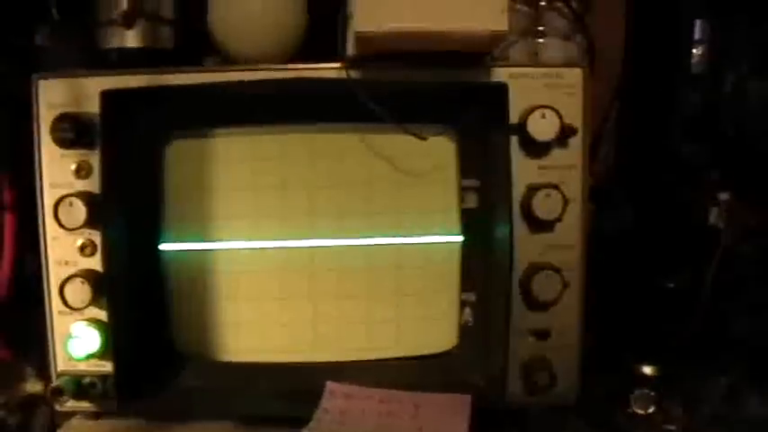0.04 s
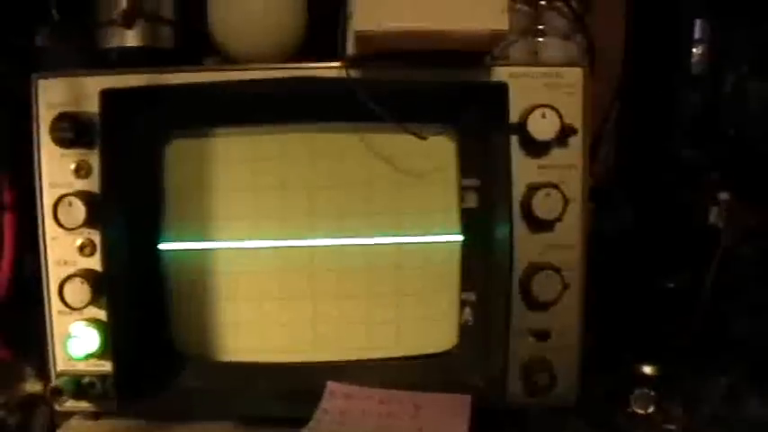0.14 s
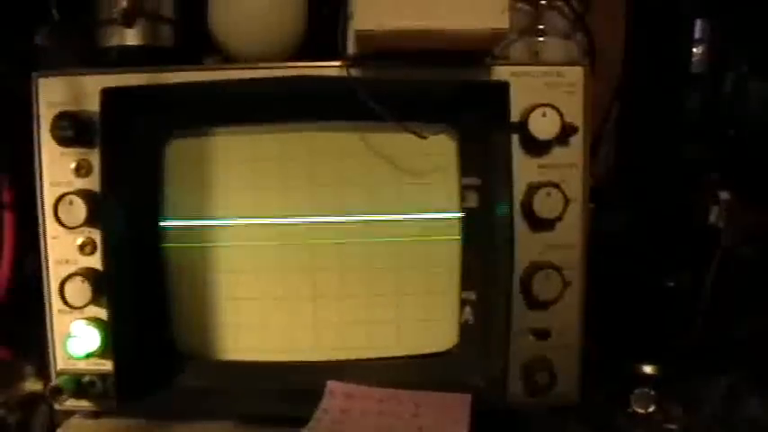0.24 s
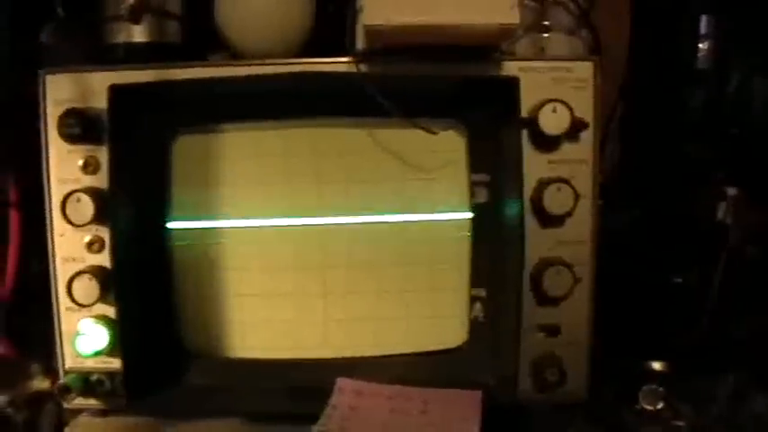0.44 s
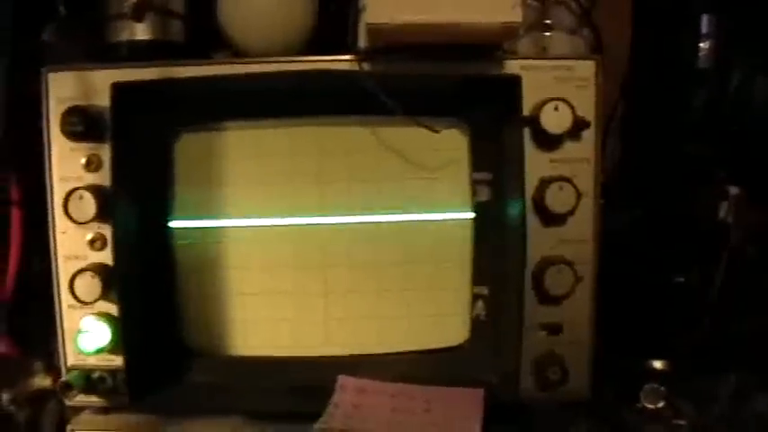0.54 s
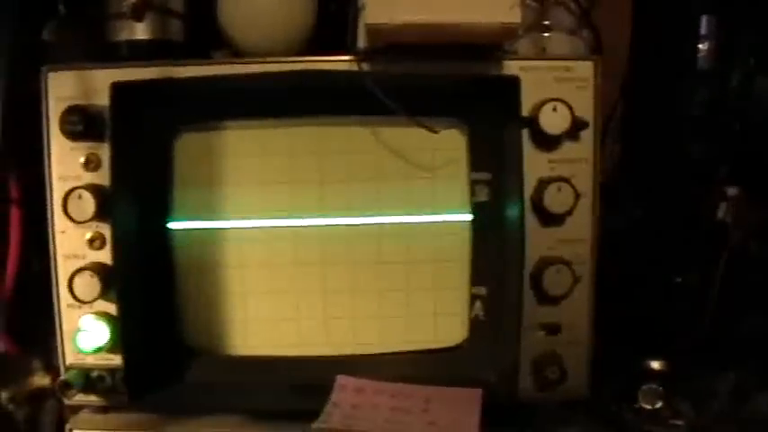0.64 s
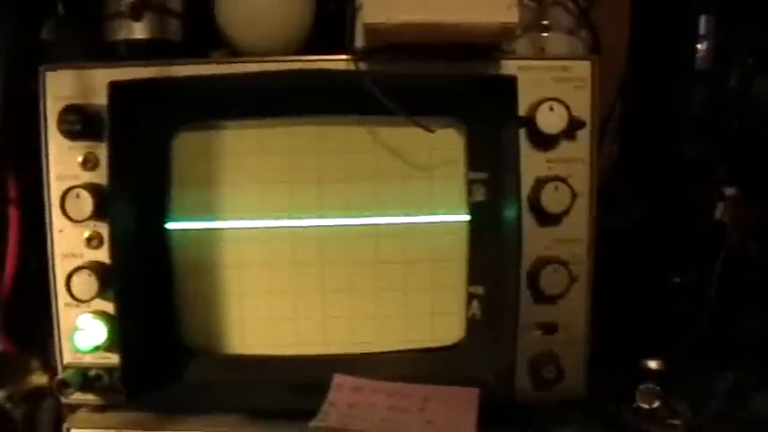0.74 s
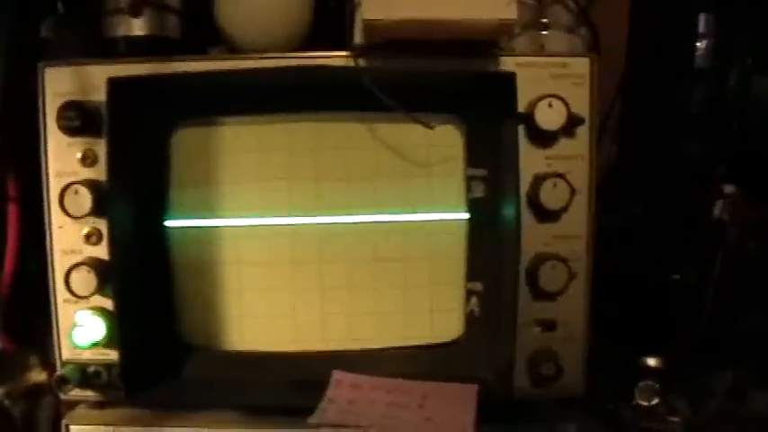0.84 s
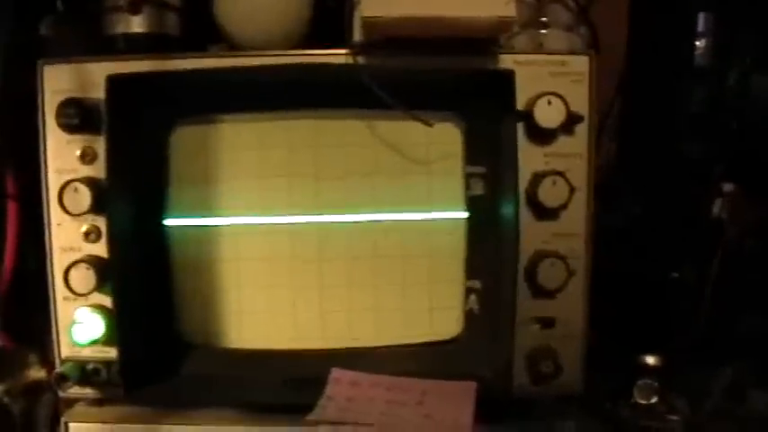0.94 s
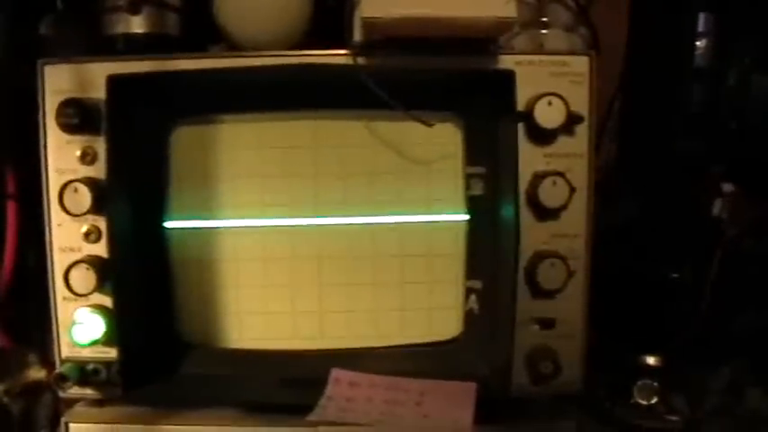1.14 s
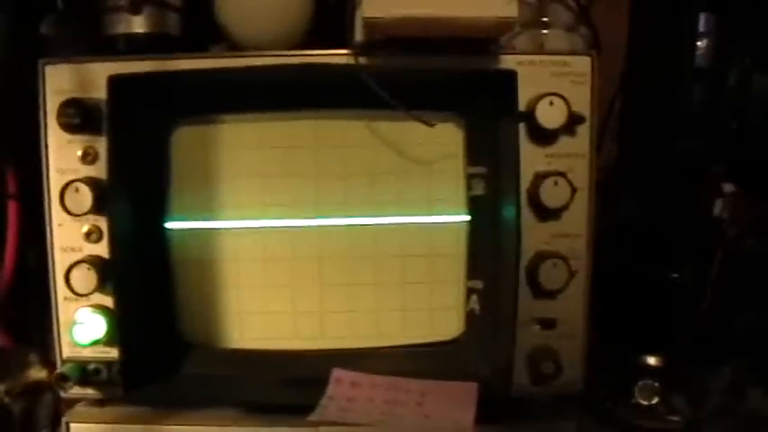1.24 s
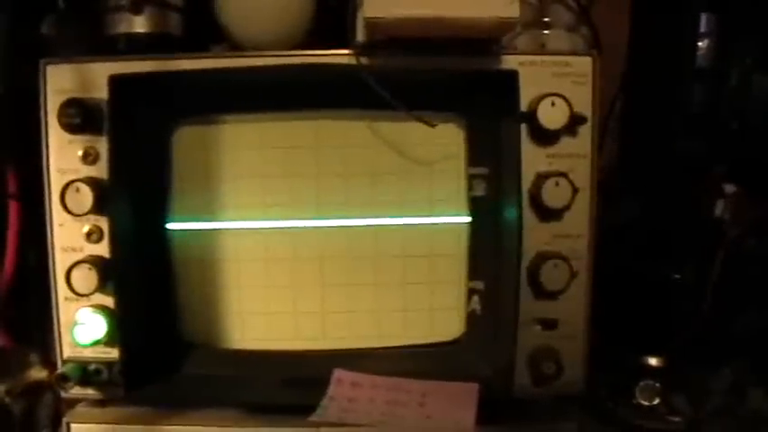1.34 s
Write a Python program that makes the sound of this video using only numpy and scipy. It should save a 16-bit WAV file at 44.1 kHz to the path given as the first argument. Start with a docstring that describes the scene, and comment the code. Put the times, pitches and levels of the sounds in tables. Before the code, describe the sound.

Quiet low fan hum in a small room, then one sharp, bright switch click with a tiny chatter, a faint metallic ring and a quick room tail, close-miked and overloaded; afterwards only the hum continues.

```python
"""Snap switch on a workbench

A small switch is thrown once: its lever slips, slams and chatters, close to a microphone whose input clips.
Each blow rings decaying housing modes; the slam also rings spring and panel. Delayed copies make the bench
echoes and fading noise the room. Behind it a fan hums in wavering sines over a low rush of shaped noise."""
import sys
import numpy as np
from scipy import signal
from scipy.io import wavfile
from scipy.ndimage import uniform_filter1d

SR = 44100
rng = np.random.default_rng(int(sys.argv[2]) if len(sys.argv) > 2 else 0)


def wav_out(sig):
    """Save sig, one row per channel (or a flat mono array), as 16-bit PCM at SR to the path in sys.argv[1]."""
    wavfile.write(sys.argv[1], SR, np.round(np.clip(np.atleast_2d(sig).T, -1, 1) * 32767).astype(np.int16))


N = 61739  # length in samples


def gain_of(db):
    """Amplitude factor for a level in dB."""
    return 10 ** (np.asarray(db) / 20)


def evened(x):
    """Scale to an rms of one."""
    return x / np.sqrt(np.mean(x ** 2) + 1e-20)


def read_curve(points, hz):
    """Read a frequency curve, with straight lines between points on a log frequency axis."""
    f, value = np.transpose(points)
    return np.interp(np.log(hz + 1), np.log(f + 1), value)


def highpass(x, hz):
    """Fourth-order low cut."""
    return signal.sosfilt(signal.butter(4, hz, "high", fs=SR, output="sos"), x)


def drift(t, top_hz):
    """Slow chance movement of rms one: sines of random phase from 0.5 Hz up to top_hz, slower ones stronger."""
    total = 0
    for f in np.geomspace(.5, top_hz, num=20):
        total = total + np.sin(2 * np.pi * (f * t + rng.random())) / np.sqrt(f)
    return evened(total)


def stereo_noise(size, likeness, field_db):
    """Noise from random short-time spectra: field_db(hz, t) shapes it, likeness ties right to left."""
    hop = size // 4
    frames = N // hop + 5
    hz = np.fft.rfftfreq(size, 1 / SR)[:, None]
    a, b, c, d = rng.standard_normal((frames, len(hz), 4)).T
    like = np.clip(read_curve(likeness, hz), -1, 1)
    left, other = a + 1j * b, c + 1j * d
    right = like * left + np.sqrt(1 - like ** 2) * other
    shaped = np.array([left, right]) * gain_of(field_db(hz, np.arange(frames) * hop / SR))
    return signal.istft(shaped, nperseg=size, noverlap=size - hop)[1][:, :N]


# balance of the switch at the two microphone ports: f/Hz, left over right level/dB
PORT_BALANCE = [(600, 0), (2500, -1), (5000, 0.503), (7000, -2), (9000, 0), (11000, -1.5), (14500, 1)]
# phase between the two ports: f/Hz, left lead/rad
PORT_LEAD = [(600, .3), (2500, 0.48), (5000, .1), (7000, .5), (9000, 0.55), (11000, .5), (13500, 1.5),
             (15000, .6)]


def ring(modes, start, rise_s=1e-5):
    """Struck modes: sines that fade exponentially from time start, table neighbours in opposite sense."""
    out = np.zeros((2, N))
    first = int(start * SR)
    span = slice(first, first + int(SR * max(row[2] for row in modes)))
    t = np.maximum(np.arange(N)[span] / SR - start, 0)
    side = np.array([[.5], [-.5]])  # half of each port difference to left and right
    for k, (hz, db, t60) in enumerate(modes):
        level = gain_of(side * read_curve(PORT_BALANCE, hz) + db - 60 * t / t60)
        wave = np.sin(2 * np.pi * hz * t + side * read_curve(PORT_LEAD, hz))
        out[:, span] -= (-1) ** k * level * wave
    out[:, span] *= 1 - np.exp(-t / rise_s)
    return out


# contacts inside the switch, the second being the slam: t/s, relative level/dB
BLOWS = [(.2368, -22), (.23745, 0), (.23815, -7), (.2391, -14)]
# housing modes: f/Hz, relative level/dB, t60/s
HOUSING_MODES = [(1829, -8.5, .02), (2330, -8.5, .02), (2640, -11, .018), (3330, -2.5, .014),
                 (3800, -5, .012), (4380, 0, 0.0081), (5660, -6, 0.011), (6350, -5, .014),
                 (7975, -8.5, .01), (8900, -10.5, 0.013), (11180, -8, 0.0098), (13900, -18.5, .008),
                 (15100, -10.5, .009), (15200, -16.5, .008)]
HOUSING_DB, RADIATES_HZ = -5, 1500


def housing():
    """Every blow rings the small shell, which radiates little below RADIATES_HZ."""
    rung = sum(gain_of(db) * ring(HOUSING_MODES, s, rise_s=.0001) for s, db in BLOWS)
    return gain_of(HOUSING_DB) * highpass(rung, RADIATES_HZ)


# spring and metal parts: f/Hz, level/dB, t60/s
SPRING_MODES = [(3311, -35, .27), (4398, -42, .25), (6326, -51, .44), (9938, -59, .28), (10750, -55, .26),
                (10800, -57, .22), (11310, -56, .2), (11520, -56, .2), (12090, -54, .22), (13140, -51, .22),
                (13770, -48, .27)]
SPRING_RISE_S = .004


def spring():
    """The slam sets thin metal going: quiet, slowly dying modes that swell in."""
    return ring(SPRING_MODES, BLOWS[1][0], SPRING_RISE_S)


# panel around the switch: f/Hz, relative level/dB, t60/s
PANEL_MODES = [(620, -12.5, 0.056), (837, -8, .15), (880, 2, .03), (1051, -8, 0.12), (1467, -4.5, .05),
               (2040, 4, .04), (2330, 3.5, .06), (3347, 5, 0.035), (3720, 4.5, .05), (5290, -1, 0.055),
               (6670, -1, .03), (6850, -0.5, 0.037)]
PANEL_DB, PANEL_LAG_S, PANEL_RISE_S = -27, .0025, .002


def panel():
    """The panel answers the slam a little later, with lower modes as well."""
    return gain_of(PANEL_DB) * ring(PANEL_MODES, BLOWS[1][0] + PANEL_LAG_S, PANEL_RISE_S)


# reflections off bench and equipment: delay t/s, level under the housing/dB, dulling f/Hz
ECHOES = [(.0029, -18.5, 4000), (.0048, -18.5, 6760), (.0063, -18, 4000), (.009, -19, 3000),
          (0.014, -22, 6000), (0.0147, -26, 6000)]


def bench(x):
    """Single reflections: delayed, quieter copies with the treble dulled."""
    out = np.zeros_like(x)
    for delay, db, dull_hz in ECHOES:
        k = round(delay * SR)
        dulled = signal.lfilter(*signal.butter(2, min(dull_hz, 20000), fs=SR), x)
        out[:, k:] += gain_of(db) * dulled[:, :-k]
    return out


# colour of the room tail: f/Hz, relative level per Hz/dB
TAIL_COLOUR = [(400, -30), (600, -14), (1370, -6), (1830, -9), (2320, 0.05), (2800, -8), (3600, -3),
               (4700, -14), (5500, -9), (7500, -17), (10500, -24), (13800, -23), (15500, -32), (16400, -50)]
# decay of the tail: f/Hz, t60/s
TAIL_T60 = [(500, 0.18), (1000, 0.16), (2000, 0.15), (4000, 0.14), (8000, 0.15), (16000, 0.11)]
# left-right likeness of the tail: f/Hz, likeness/0-1
TAIL_LIKENESS = [(500, .6), (1650, 0.47), (5000, 1), (9000, 0.56), (15000, 0.22)]
TAIL_DB, TAIL_RISE_S, TAIL_LOW_HZ = -20, .006, 550


def room():
    """Diffuse tail of the slam: noise in which each band dies at its own speed."""
    start = BLOWS[1][0]

    def field(hz, t):
        fade_db = 60 * np.clip(t - start, 0, 1) / read_curve(TAIL_T60, hz)
        return read_curve(TAIL_COLOUR, hz) - fade_db

    tail = stereo_noise(256, TAIL_LIKENESS, field)
    rise = np.clip((np.arange(N) / SR - start) / TAIL_RISE_S, 0, 1)
    k = round(start * SR)
    head = tail[:, k - 2000:k]  # still undecayed: sets the level, then muted by the rise
    heard = gain_of(TAIL_DB) * rise * tail / np.sqrt(np.mean(head ** 2))
    return highpass(heard, TAIL_LOW_HZ)


# fan harmonics: multiple of HUM_HZ, mean level/dB rms
HUM = [(1, -61), (2, -57.5), (3, -65), (4, -64.5), (5, -59.5), (6, -64.5), (7, -68), (8, -68.5), (9, -72),
       (10, -65.5), (12, -71.5)]
# other steady tones: f/Hz, mean level/dB rms
TONES = [(55, -68), (241, -63), (1152, -78.5), (1319, -70.5)]
HUM_HZ, WAVER_DB = 75.13, 0.5  # waver is rms


def hum():
    """Fan harmonics and a few lone tones: sines of steady pitch, each wavering in level."""
    t = np.arange(N) / SR
    coarse_t = np.arange(0, N, 64) / SR
    out = np.zeros(N)
    for hz, db in [(k * HUM_HZ, db) for k, db in HUM] + TONES:
        waver = np.interp(t, coarse_t, drift(coarse_t, top_hz=3.3))
        level = np.sqrt(2) * gain_of(db + WAVER_DB * waver)  # rms to peak
        out += level * np.sin(2 * np.pi * (hz * t + rng.random()))
    return out


# colour of the air rush: f/Hz, relative level per Hz/dB
AIR_COLOUR = [(20, -43.5), (35, -36.5), (55, -14.5), (90, -16.5), (110, -0.5), (135, -7.5), (165, -0.5),
              (198, -7), (220, -3), (270, -8), (360, -6.5), (410, -14.5), (500, -19), (640, -14),
              (900, -17), (2000, -24), (5000, -36), (14300, -50.5), (16400, -60)]
# left-right likeness of the air: f/Hz, likeness/0-1
AIR_LIKENESS = [(60, .9), (130, .94), (290, 0.92), (640, .6), (1400, 0.78), (3100, 0.4), (7000, 0.12),
                (15000, .1)]
AIR_DB, PATCH_DB, SWELL_DB = -47.5, 1, 0.04  # all rms


def air():
    """Low rush: coloured noise with faint patches in time and pitch and a very slight swell."""
    def field(hz, t):
        patches = rng.standard_normal((len(t), len(hz))).T
        patches = uniform_filter1d(patches, size=32, axis=0)  # across frequency
        patches = evened(uniform_filter1d(patches, size=3, axis=1))  # across time
        return read_curve(AIR_COLOUR, hz) + PATCH_DB * patches + SWELL_DB * drift(t, top_hz=1.9)
    return gain_of(AIR_DB) * evened(stereo_noise(4096, AIR_LIKENESS, field))


def scene():
    """Switch, its echoes and room, over air and hum; only the housing feeds the bench."""
    shell = housing()
    snap = shell + spring() + panel()
    return snap + bench(shell) + room() + air() + hum()


CEILING, EDGE_HZ = 1., 16450  # full scale; top of the band


def record(dry):
    """The input clips at full scale, then a steep low-pass limits the band."""
    clipped = np.clip(dry, -CEILING, CEILING)
    lowpass = signal.firwin(767, EDGE_HZ, window=("kaiser", 9), fs=SR)
    return signal.oaconvolve(clipped, lowpass[None], "same")


dry = scene()
out = record(dry)
wav_out(out)
```